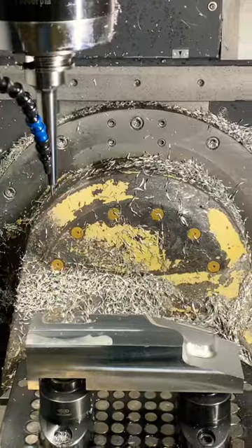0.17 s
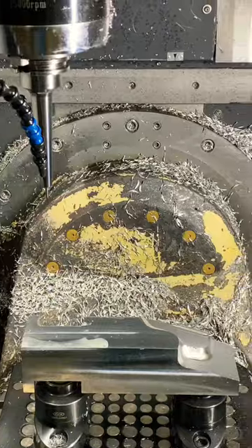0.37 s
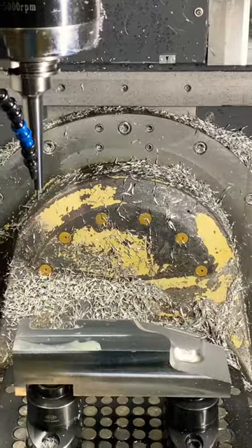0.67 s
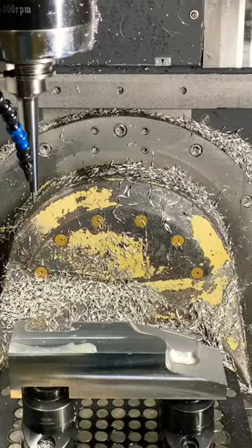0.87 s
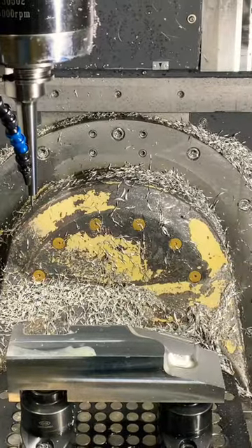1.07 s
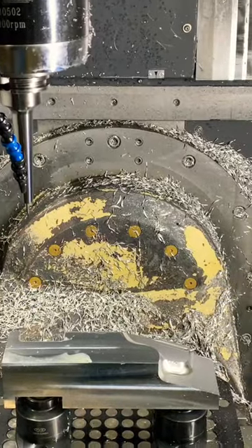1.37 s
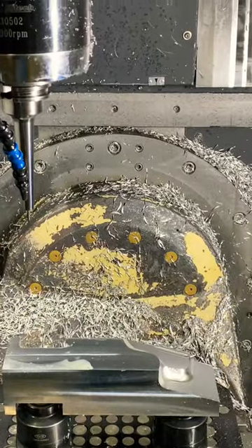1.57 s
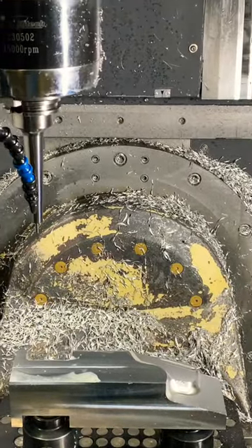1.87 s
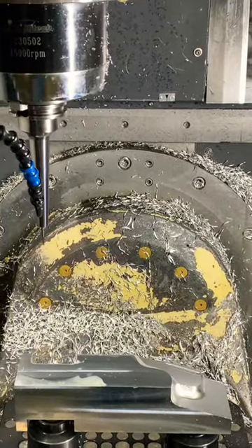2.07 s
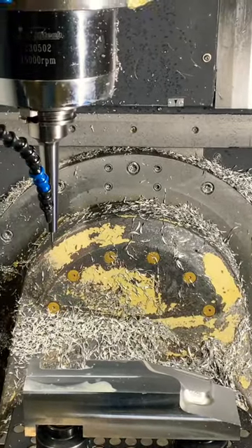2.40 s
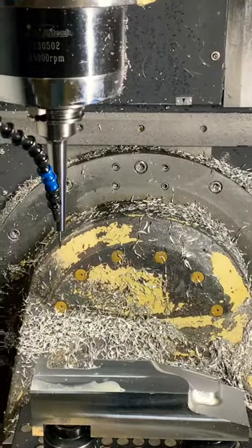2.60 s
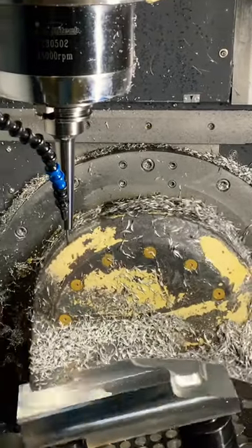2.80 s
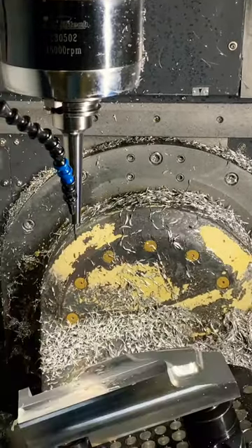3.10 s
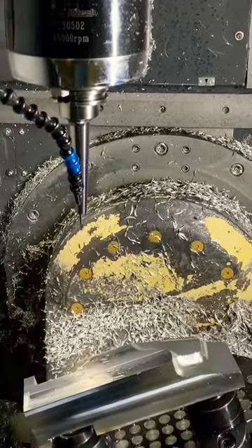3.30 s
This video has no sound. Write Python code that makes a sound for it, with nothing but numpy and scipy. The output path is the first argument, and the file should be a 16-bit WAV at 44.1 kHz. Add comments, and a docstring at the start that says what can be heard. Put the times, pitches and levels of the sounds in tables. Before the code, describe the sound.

Inside a metal machining enclosure, close up: continuous high airy hiss from the nozzle, faint thin whines, a quiet throbbing low drone, and brief muffled hums at uneven intervals as the tool bites harder.

```python
"""An air jet hisses at the cutter of a machining centre, heard from close by inside its steel enclosure:
shaped noise, part direct and part diffuse, rippled in frequency and fluttering in level.
Narrow noise bands whine faintly and ring as panels; unsteady sines hum as the drive.
The body drones as resonant noise over a rumble, and a short tone swells at each harder bite."""
import sys
import numpy as np
from scipy import signal
from scipy.fft import rfft, irfft, next_fast_len
from scipy.io import wavfile
from scipy.ndimage import uniform_filter1d, map_coordinates

SR = 44100
rng = np.random.default_rng(int(sys.argv[2]) if len(sys.argv) > 2 else 0)


def transcribe(u):
    """Save the signal u as a 16-bit wav file named by the first command-line argument.

    u: samples, shape (n,) or (channels, n), limited to [-1, 1]; the rate is SR.
    q: integer samples, one column per channel.
    """
    v = np.clip(np.atleast_2d(u).T, -1, 1)
    q = np.round(v * 32767).astype(np.int16)
    wavfile.write(sys.argv[1], SR, q)


N = 152145


def amp(db):
    """Decibels to gain."""
    return 10 ** (np.asarray(db) / 20)


def unit(x):
    """Scale to rms 1."""
    return x / np.sqrt(np.mean(x ** 2) + 1e-20)


def along(points, hz):
    """Interpolate (Hz, value) points on a log frequency axis."""
    point_hz, value = np.transpose(points)
    return np.interp(np.log(hz + 1), np.log(point_hz + 1), value)


def seconds():
    """The time of each sample."""
    return np.arange(N) / SR


def wobble(rate_hz):
    """A smooth random curve through rate_hz normal knots a second."""
    knots = rng.standard_normal(int(N * rate_hz / SR) + 4)
    return map_coordinates(knots, [seconds() * rate_hz])


def filtered(x, response):
    """Filter x by a (complex) response of frequency, zero-padded."""
    m = next_fast_len(N + SR // 2)
    spectrum = rfft(x, m) * response(np.fft.rfftfreq(m, 1 / SR))
    return irfft(spectrum, m)[..., :N]


def resonance(hz, centre_hz, width_hz):
    """Gain of a steep-sided resonance, about width_hz wide at -3 dB."""
    half_gain_offset_hz = np.abs(width_hz) * .75 + 1
    return 1 / (1 + ((hz - centre_hz) / half_gain_offset_hz) ** 2)


def tool_noise(gain):
    """Stereo noise of rms 1 from the tool: a direct part that lags on the left, plus diffuse echoes."""
    # power share arriving straight from the nozzle: freq_hz, share_0_to_1
    direct_points = [(500, 0.12), (3000, 0.01), (5500, 0.42), (7800, 0.08), (9300, 1), (13000, 1)]
    left_lag_s = 0.2718e-3
    share = lambda hz: np.clip(along(direct_points, hz), 0, 1)
    # half the lag delays the left, half advances the right
    lag = lambda hz: np.exp(np.outer([-1j, 1j], np.pi * hz * left_lag_s))
    direct = filtered(rng.standard_normal(N), lambda hz: gain(hz) * np.sqrt(share(hz)) * lag(hz))
    echoes = filtered(rng.standard_normal((2, N)), lambda hz: gain(hz) * np.sqrt(1 - share(hz)))
    return unit(direct + echoes)


def standing_waves(hz, ripple_db=3, spacing_hz=23.86):
    """The enclosure's fixed, finely rippled colour (dB): random knots within +-ripple_db."""
    knots = 2 * rng.random(4096) - 1
    return ripple_db * np.interp(hz / spacing_hz, np.arange(len(knots)), knots)


def patchy(x, depth_db):
    """Turbulence: patches of frequency swell and fade at random; rms 1."""
    z = signal.stft(x, nperseg=1024)[2]
    field = rng.standard_normal(z.shape[1:])  # frequency x time, shared by both sides
    field = uniform_filter1d(field, size=7, axis=0)
    field = uniform_filter1d(field, size=5, axis=1)
    patched = signal.istft(z * amp(depth_db * unit(field)), nperseg=1024)[1]
    return unit(patched[:, :N])


def air_jet(flutter_db=0.44, sputter_db=.4):
    """The jet hisses and flutters slightly as it breaks on the tool."""
    # spectral shape of the hiss: freq_hz, relative_db_per_hz
    jet_shape = [(300, -9), (550, -12), (900, -8.5), (1200, -12), (1900, -8.5), (2500, -6), (3000, -5.5),
                 (3600, -3.5), (4150, -5), (5300, 2.1), (6300, 0.1), (7000, 1.5), (8400, -3), (9600, -0.5),
                 (12300, -1), (14000, 0.4), (15700, -4.4)]
    # slow course of the hiss, used relative to its mean: time_s, level_db
    hiss_course = [(0.06, -24), (2.87, -24), (3.32, -24.5), (3.44, -24)]
    jet_db = -23
    time_s, level_db = np.transpose(hiss_course)
    flow_db = np.interp(seconds(), time_s, level_db - level_db.mean())
    flow_db = flow_db + flutter_db * wobble(22.03) + sputter_db * wobble(250)
    hiss = tool_noise(lambda hz: amp(along(jet_shape, hz)))
    hiss = filtered(hiss, lambda hz: amp(standing_waves(hz)))
    return amp(jet_db + flow_db) * patchy(hiss, depth_db=1.3)


def whines():
    """Thin unsteady tones around the spinning tool: narrow resonances of noise."""
    # faint whines: centre_hz, width_hz, rms_db
    whine_bands = [(4724, 20, -54), (5235, 40, -50), (6826, 50, -52), (10384, 35, -50.5), (11472, 35, -54),
                   (14212, 35, -45.5), (15138, 28, -51)]
    return sum(amp(db) * tool_noise(lambda hz: resonance(hz, centre_hz, width_hz))
               for centre_hz, width_hz, db in whine_bands)


def drive(drift=0.0046, waver_db=1.95):
    """Low sines of the drive, slightly unsteady in pitch (relative drift) and level."""
    # hum of the drive: pitch_hz, rms_db
    hum_tones = [(75, -46), (128.6, -40), (147, -50)]
    phase = lambda hz: 2 * np.pi * np.cumsum(hz * (1 + drift * wobble(6.33))) / SR
    return sum(amp(db + waver_db * wobble(7.27)) * np.sqrt(2) * np.sin(phase(pitch_hz))
               for pitch_hz, db in hum_tones)


def low_noise(gain):
    """Stereo noise of rms 1 from the machine; a mid/side mix sets the left-right likeness."""
    # left-right correlation of the low sounds: freq_hz, correlation_0_to_1
    alike_points = [(60, 1), (260, .93), (400, 0.46), (700, 0.84)]
    turn = lambda hz: np.arccos(np.clip(along(alike_points, hz), -1, 1)) / 2
    mid_side_gain = lambda hz: gain(hz) * np.array([np.cos(turn(hz)), np.sin(turn(hz))])
    mid, side = filtered(rng.standard_normal((2, N)), mid_side_gain)
    return unit(np.array([mid + side, mid - side]))


def body(throb_db=1.0):
    """The cut shakes the body's resonances, which throb over a broad steady rumble."""
    # resonances of the machine's body: centre_hz, width_hz, rms_db
    body_modes = [(49, 7.4, -48.5), (72.6, 15, -44), (172.6, 7.2, -46), (240.7, 16.8, -36.5),
                  (271.8, 26, -39.5), (378, 36, -49.5)]
    # spectral shape of the rumble: freq_hz, relative_db_per_hz
    rumble_shape = [(22, -35), (29, -15), (36, 3), (60, -20), (100, -1.5), (135, 2.5), (200, -12.5),
                    (320, -7), (450, -7), (560, -21), (1000, -24)]
    rumble_db = -39
    drone = sum(amp(db) * low_noise(lambda hz: resonance(hz, centre_hz, width_hz))
                for centre_hz, width_hz, db in body_modes)
    rumble = amp(rumble_db) * low_noise(lambda hz: amp(along(rumble_shape, hz)))
    return drone * amp(throb_db * wobble(16)) + rumble


def panels():
    """The enclosure rings weakly with the noise inside it; once a hollow tone swells."""
    # ringing of the panels: centre_hz, width_hz, rms_db
    panel_modes = [(620, 27, -58.5), (712, 34, -54.5), (817, 30, -60.5), (1375, 88, -55), (2230, 65, -53)]
    swell_s, swell_length_s, swell_db = 3.3, .06, -46
    swell_hz, swell_width_hz = 830, 140
    ring = sum(amp(db) * low_noise(lambda hz: resonance(hz, centre_hz, width_hz))
               for centre_hz, width_hz, db in panel_modes)
    swell = amp(swell_db) * np.exp(-((seconds() - swell_s) / swell_length_s) ** 2)
    return ring + swell * low_noise(lambda hz: resonance(hz, swell_hz, swell_width_hz))


def bites(phase_noise_rad=0.16):
    """At each harder bite the main resonance swells and dies: a sine in a Gaussian envelope."""
    # harder bites of the cutter: peak_time_s, pitch_hz, peak_db, length_s
    bite_events = [(.07, 246.6, -26.5, .045), (.283, 264.5, -21.5, 0.026), (0.461, 233, -30.5, 0.065),
                   (.705, 251, -27, 0.029), (1.22, 246, -27, .04), (1.756, 245, -32, 0.027),
                   (2.31, 240.3, -23.5, 0.039), (2.601, 240.2, -29, 0.1), (3.037, 250, -19.5, 0.015)]
    total = np.zeros(N)
    for peak_time_s, pitch_hz, peak_db, length_s in bite_events:
        t = seconds() - peak_time_s
        envelope = amp(peak_db) * np.exp(-2 * (t / length_s) ** 2)
        phase = 2 * np.pi * (pitch_hz * t + rng.random()) + phase_noise_rad * wobble(90)
        total += envelope * np.sin(phase)
    return total


def scene(low_cut_hz=30):
    """All sources together, tilted between the sides by frequency, with no deep bass."""
    # left-right balance: freq_hz, left_minus_right_db
    lean_points = [(70, -2), (130, 3.6), (250, 1), (600, 3.5), (1200, 3.5), (2500, 1.7), (4000, 0.8),
                   (5300, 2.5), (8000, 0.9), (10000, 0)]
    machine = air_jet() + whines() + drive() + body() + panels() + bites()
    balance = lambda hz: amp(np.outer([.5, -.5], along(lean_points, hz)))
    low_cut = lambda hz: 1 / np.sqrt(1 + (low_cut_hz / (hz + 1)) ** 10)
    return filtered(machine, lambda hz: balance(hz) * low_cut(hz))


def record(dry, start_s=0.035, fade_s=.002, top_hz=15750):
    """The microphone opens just after the start and keeps nothing above its band limit."""
    opened = np.clip((seconds() - start_s) / fade_s, 0, 1)
    return filtered(dry * opened, lambda hz: hz < top_hz)


dry = scene()
out = record(dry)
transcribe(out)
```